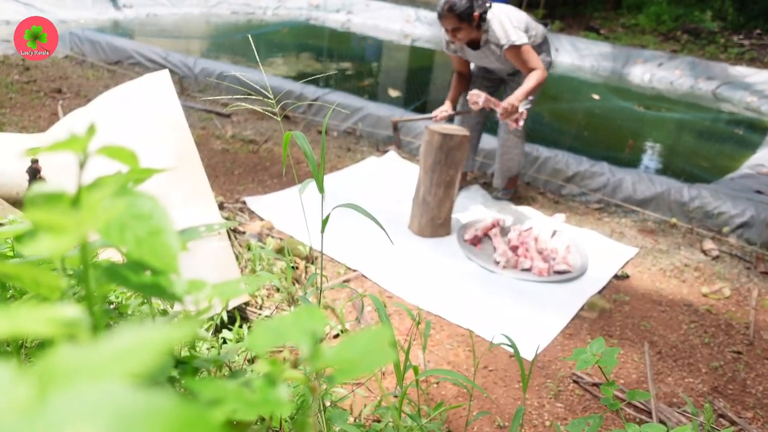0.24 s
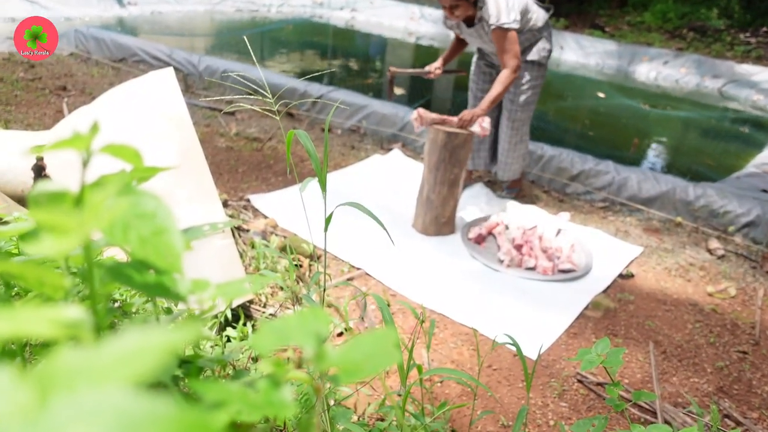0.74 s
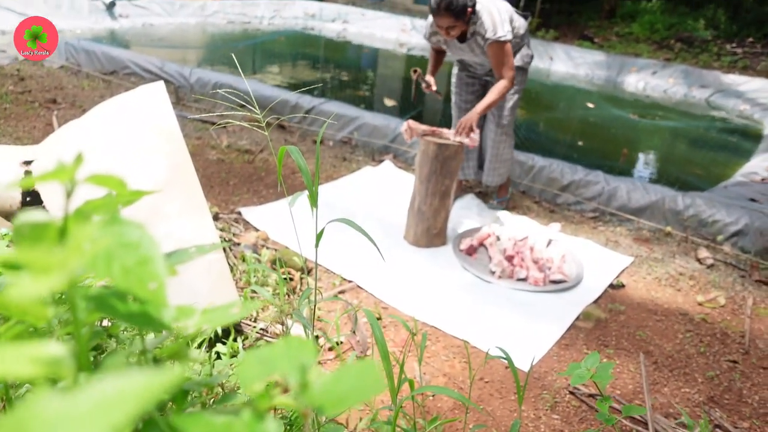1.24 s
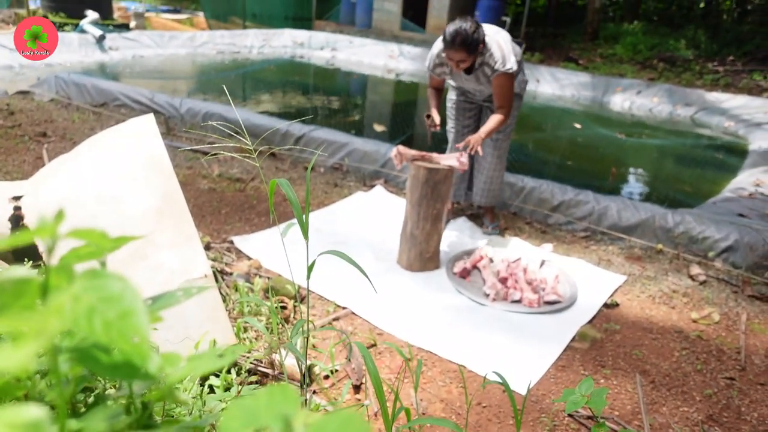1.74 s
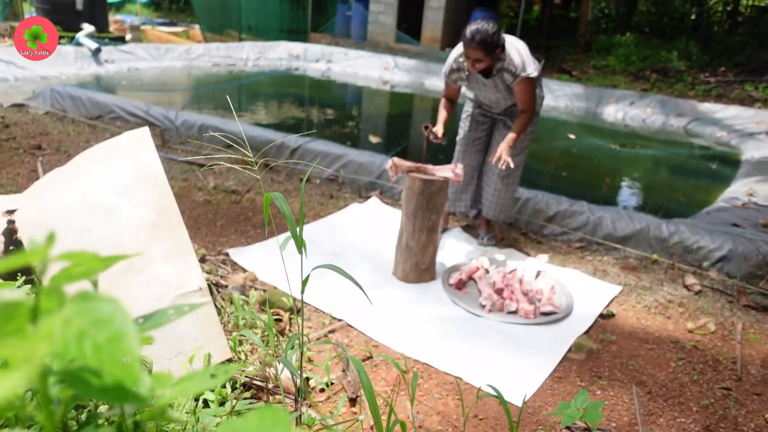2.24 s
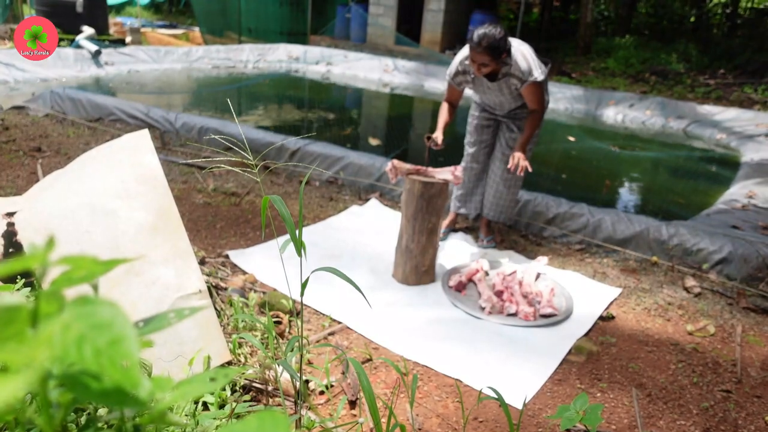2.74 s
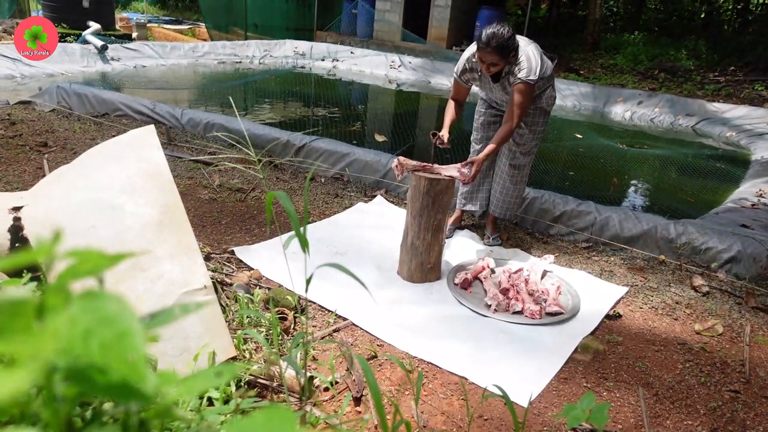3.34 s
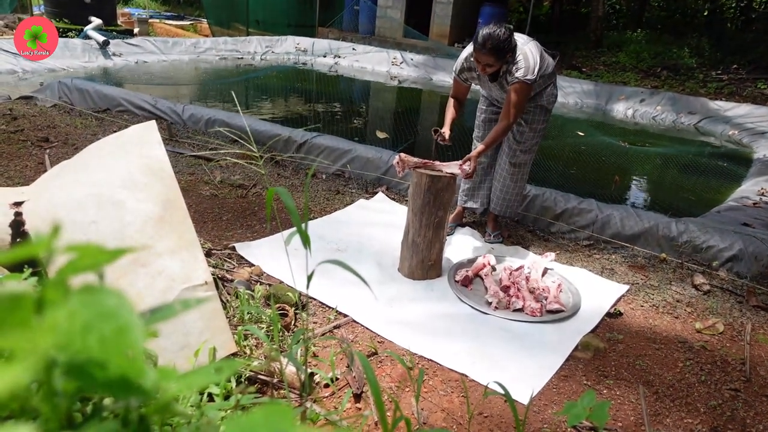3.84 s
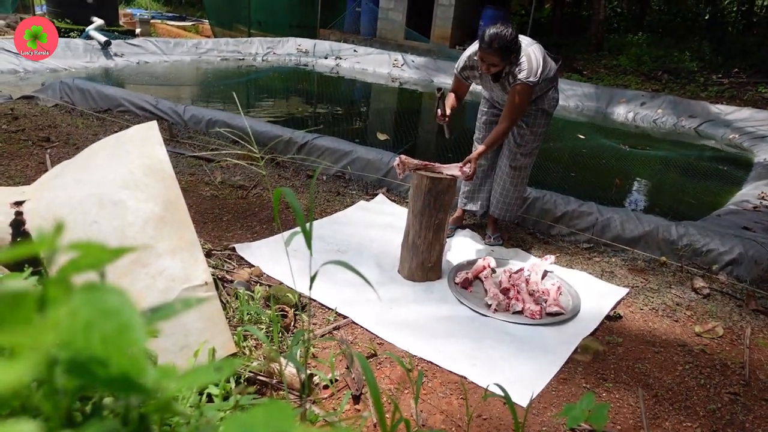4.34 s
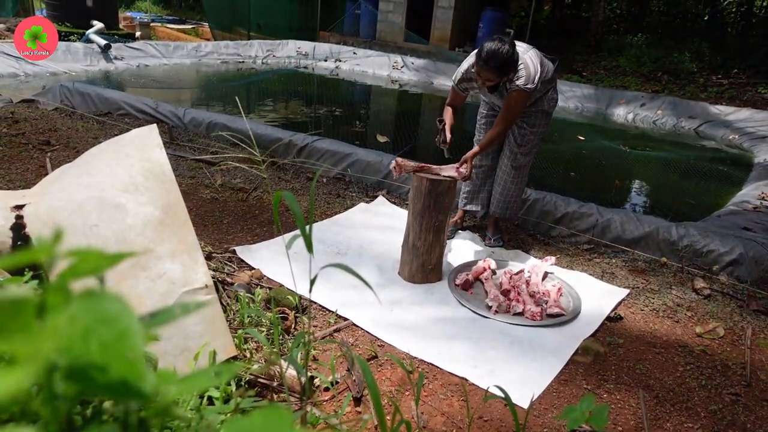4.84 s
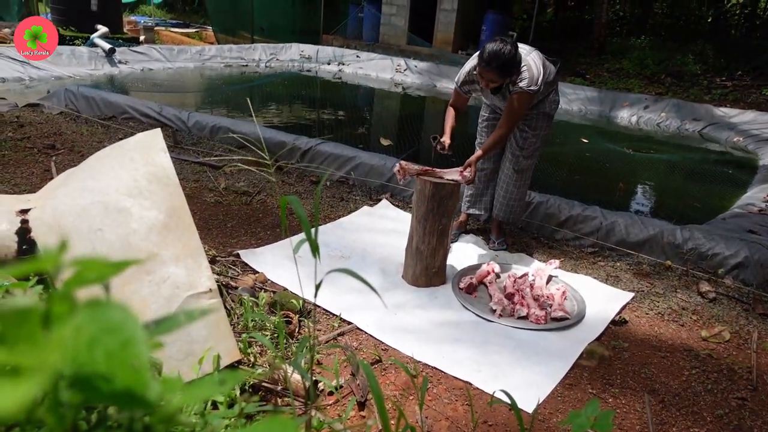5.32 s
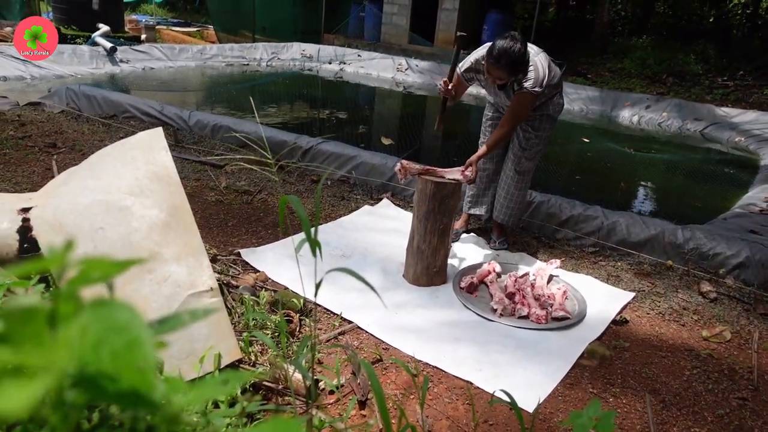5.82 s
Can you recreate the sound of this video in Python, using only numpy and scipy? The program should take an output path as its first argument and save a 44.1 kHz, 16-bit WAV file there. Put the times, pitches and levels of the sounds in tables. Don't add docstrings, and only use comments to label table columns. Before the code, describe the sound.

Heard in open air from a few metres, slightly right of centre: small irregular taps of blade on bone and wood, a few tiny scuffs on a sheet, then a loud bony crack whose axe head rings on at a thin high pitch. After another light tap, a second heavy blow ends the scene. Continuous shrill cicadas, light breeze in grass, low traffic rumble and faint hiss.

```python
import sys
import numpy as np
from scipy import signal
from scipy.fft import rfft, irfft, next_fast_len
from scipy.io import wavfile
from scipy.ndimage import map_coordinates

SR = 44100
rng = np.random.default_rng(int(sys.argv[2]) if len(sys.argv) > 2 else 0)


def int16_out(signal):
    q = np.round(np.clip(np.atleast_2d(signal).T, -1, 1) * 32767)
    wavfile.write(sys.argv[1], SR, q.astype(np.int16))


def linear_from_db(decibels):
    return 10 ** (np.asarray(decibels, float) / 20)


N = 267907

# f/Hz, width/Hz, level/dB
DRONE_MODES = [(2143.5, 171, 5), (4294, 376, -2), (6550, 740, -7)]
# f/Hz, width/Hz, level/dB
SHRILL_MODES = [(8222, 1000, 11.5), (8690, 683, 15)]
# t/s, level/dB
CHORUS_EFFORT = [(0.0, -43), (0.97, -41), (1.5, -41.5), (2.0, -40), (5.37, -41.5), (5.7, -42), (6.04, -44)]
# t/s, level/dB
BREEZE_STRENGTH = [(0, 4.5), (0.701, -1), (1.0, 0.5), (2.0, 0), (2.15, -8), (2.4, 3), (3.1, -3.5),
                   (3.85, -1), (4.05, 1.5), (4.25, -16.5), (4.65, -15), (5.2, -10), (5.8, -9),
                   (6.07, -12.5)]
# f/Hz, level/dB
GRASS_SPECTRUM = [(3000, -52), (3800, 1), (4600, 4.5), (5600, -1.5), (6600, -2), (7600, -9), (9000, 5),
                  (9800, -64)]
# f/Hz, level/dB
LEAF_SPECTRUM = [(1800, -50), (2500, 10), (3000, 12), (3400, 8), (4000, -27), (5000, -43)]
# f/Hz, level/dB
WASH_SPECTRUM = [(120, -35), (250, -5), (400, -8), (640, -0.5), (900, -8), (1400, -2.5), (1800, -6.5),
                 (2500, -1), (3400, -100), (5000, -70)]
# f/Hz, level/dB
RUMBLE_SPECTRUM = [(15, -64), (30, -42), (48, -36), (63, -20), (86, -4), (150, 0), (180, -5), (210, -10),
                   (300, -20), (400, -34), (600, -120)]
# t/s, length/s, swell/dB
VEHICLES = [
    (0.415, 1, 5.5),
    (1.14, .6, 7),
    (2.413, 0.81, 4),
    (3.297, 0.64, 4.5),
    (3.845, 0.2, 8),
    (4.404, 0.3, 5),
    (4.886, 0.5, 7),
    (5.547, 0.57, 8),
    (6.07, .3, 9),
]
# t/s, edge/dB, log/dB, log f/Hz, bone/dB
TAP_EVENTS = [(0.7096, -25.5, -22, 680, -5), (0.7118, -21, -3, 623, -11), (0.7147, -16, -15.5, 563, -17),
              (0.75, -29.5, -12, 413, -26), (0.7741, -24, -22, 496, -24), (.7885, -47, -22, 497, -24),
              (0.813, -33.5, -9.5, 394, -22), (2.032, -26.5, -1, 626, 2.5), (2.3048, -33.5, -32, 611, -31),
              (2.4383, -27.5, -5.5, 560, -19), (2.791, -32, -7.5, 444, -16), (3.8413, -33, 1, 542, -5.5),
              (4.1968, -29.5, -0.5, 487, -6), (5.233, -45, -23, 415, -32), (5.3989, -30, 4, 600, -3.5)]
# f/Hz, width/Hz, level/dB
EDGE_MODES = [(2220, 600, 1.5), (4000, 1500, 2), (5920, 1640, 0), (8800, 2100, -7.5), (10650, 1000, -13.5)]
# f/log pitch, level/dB, t60/s
KNOCK_MODES = [(.7, -11.5, 0.009), (1.001, 6, 0.012), (1.45, -3, 0.017), (2.05, -8, 0.023)]
# f/Hz, level/dB, t60/s
CLACK_MODES = [(1388, 0.5, 0.033), (1726, 2, 0.028), (2620, -28, 0.072)]
HEAD_HZ = [398, 1455, 1950, 2130, 2207, 2972, 3241, 3720, 3973, 5044, 5663]
# level/dB, t60/s
HEAD_DECAYS = [(-17, 0.25), (-17, 0.087), (-12, .07), (-8, .1), (0, 1.5), (-7, 0.11), (-24, 0.16),
               (-30, 0.2), (-25, .4), (-14.5, 0.6), (-26, 0.6)]
# delay/s, transition/s
GRIP_S = (.044, .005)
# f/Hz, t60/s
ECHO_T60 = [(150, 1), (500, 0.41), (1500, 0.68), (3000, 0.94), (6000, 0.65), (12000, 0.83)]
# f/Hz, level/dB
ECHO_SPECTRUM = [(200, -24), (700, 0), (2100, -7), (3300, 3), (5000, -1), (8000, -3), (14000, -5.5)]
# t/s, length/s, level/dB
SCUFF_EVENTS = [
    (1.504, 0.01, -37),
    (1.519, 0.018, -39),
    (2.275, 0.021, -59),
    (2.52, 0.057, -34.5),
    (2.579, 0.03, -45),
]
# f/Hz, level/dB
SCUFF_SPECTRUM = [(500, -19), (1000, -1.5), (2500, 2.5), (4500, -1.5), (7000, -13), (11000, -25)]
# t/s, peak/dB, log/dB, edge/dB
BLOW_EVENTS = [
    (4.78, -4.5, 0, 1),
    (6.048, -7.5, 4.5, 2),
]
# f/Hz, width/Hz, level/dB
WOOD_MODES = [(422, 110, 4.5), (600, 170, 1), (910, 120, -3)]
# f/Hz, width/Hz, level/dB
BONE_MODES = [(1458, 73, 4), (1567, 174, -3.5), (2120, 264, 1), (2430, 67, -46.5)]
# f/Hz, level/dB
HISS_SPECTRUM = [(8500, -40), (9800, -4), (10800, 0), (11500, -3), (12300, 0), (14000, 0), (16000, 0)]


def unit(x):
    return x / np.sqrt(np.mean(x ** 2) + 1e-20)


def along(points, hz):
    f, v = np.transpose(points)
    return np.interp(np.log(hz + 1), np.log(f + 1), v)


def over_time(points):
    return np.interp(np.arange(N) / SR, *np.transpose(points))


def wobble(rate_hz):
    knots = rng.standard_normal(int(N * rate_hz / SR) + 4)
    return map_coordinates(knots, [np.arange(N) * rate_hz / SR])


def filtered(x, response):
    m = next_fast_len(N + SR // 2)
    return irfft(rfft(x, m) * response(np.fft.rfftfreq(m, 1 / SR)), m)[..., :N]


def resonances(modes):
    def response(f):
        total = 0
        for k, (center, width, db) in enumerate(modes):
            peak = 1j * f * width / (center * center - f * f + 1j * f * width)
            total = total + (-1) ** k * linear_from_db(db) * peak
        return total
    return response


def noise(spectrum):
    return filtered(rng.standard_normal((2, N)), lambda f: linear_from_db(along(spectrum, f)))


def spread(pair, alike, left_db):
    turn = np.arccos(np.clip(alike, 0, 1)) / 2
    mid, side = unit(pair) * [[np.cos(turn)], [np.sin(turn)]]
    return np.array([mid + side, mid - side]) * linear_from_db([[left_db / 2], [-left_db / 2]])


def add(track, s, sound):
    start = round(s * SR)
    track[start:][:len(sound)] += sound[:N - start]


def chorus(modes, clumpy_db, rate_hz):
    clumps = np.array([wobble(rate_hz), wobble(rate_hz)])
    clicks = rng.standard_normal((2, N)) * linear_from_db(clumpy_db * clumps)
    body = resonances(modes)
    return filtered(clicks, lambda f: body(f) ** 2)


def cicadas():
    effort_db = over_time(CHORUS_EFFORT)
    mean_db = effort_db.mean()
    drone_db = mean_db - 3.5 + 0.27 * (effort_db - mean_db)
    shrill = spread(chorus(SHRILL_MODES, clumpy_db=0.5, rate_hz=250), alike=0.42, left_db=-3.0)
    drone = spread(chorus(DRONE_MODES, clumpy_db=-1.0, rate_hz=24), alike=0.76, left_db=-4.0)
    shrill = shrill * linear_from_db(effort_db + 1.0 + 0.6 * wobble(12))
    return shrill + drone * linear_from_db(drone_db + 0.71 * wobble(15))


def foliage():
    breeze_db = over_time(BREEZE_STRENGTH)
    grass_db = -54 + 0.27 * breeze_db + 1.4 * wobble(3.48)
    leaves_db = -57 + breeze_db + 0.76 * wobble(42)
    grass = linear_from_db(grass_db) * spread(noise(GRASS_SPECTRUM), alike=0.45, left_db=-1.5)
    leaves = linear_from_db(leaves_db) * spread(noise(LEAF_SPECTRUM), alike=0.61, left_db=1.0)
    return grass + leaves


def traffic():
    t = np.arange(N) / SR
    rumble_db = -60.5 + 1.5 * wobble(8)
    for s, length_s, swell_db in VEHICLES:
        rumble_db += swell_db * np.exp(-(2 * (t - s) / length_s) ** 2)
    wash_db = -51.0 + 0.09 * wobble(7.6)
    wash = linear_from_db(wash_db) * spread(noise(WASH_SPECTRUM), alike=0.09, left_db=-1.0)
    rumble = linear_from_db(rumble_db) * spread(noise(RUMBLE_SPECTRUM), alike=0.94, left_db=0.0)
    return wash + rumble


def burst(rise_s, t60_s, grit_db):
    t = np.arange(SR // 10) / SR
    grit = rng.standard_normal(len(t)) * linear_from_db(grit_db * rng.standard_normal(len(t)))
    return unit(grit) * (1 - np.exp(-t / rise_s)) * linear_from_db(-60 * t / t60_s)


def damped(modes, rise_s, scatter_db):
    t = np.arange(SR // 10) / SR
    ring = np.zeros(len(t))
    for hz, db, t60_s in modes:
        level_db = db + scatter_db * rng.normal() - 60 * t / t60_s
        ring += linear_from_db(level_db) * np.sin(2 * np.pi * hz * t)
    return ring * (1 - np.exp(-t / rise_s))


def thump(start_hz, end_hz, t60_s):
    t = np.arange(SR // 5) / SR
    hz = end_hz + (start_hz - end_hz) * np.exp(-t / 0.027)
    swing = np.sin(2 * np.pi * np.cumsum(hz) / SR)
    return swing * (1 - np.exp(-t / 0.0021)) * linear_from_db(-60 * t / t60_s)


def steel(scatter_db, muffle_t60_s, soft_db):
    t = np.arange(SR) / SR
    grip_s, over_s = GRIP_S
    held = 0.05 + 0.95 / (1 + np.exp(np.minimum((t - grip_s) / over_s, 50)))
    shiver_db, shiver_hz = 3, 60
    ring = np.zeros(SR)
    for k, (hz, (db, t60_s)) in enumerate(zip(HEAD_HZ, HEAD_DECAYS)):
        knots = rng.standard_normal(shiver_hz + 1)
        shiver = np.interp(t * shiver_hz, np.arange(shiver_hz + 1), knots)
        reach = held if hz < 2500 else linear_from_db(soft_db + shiver_db * shiver)
        level = linear_from_db(db + scatter_db * rng.normal() - 60 * t / t60_s)
        ring += (-1) ** k * level * np.sin(2 * np.pi * hz * t) * reach
    return ring * linear_from_db(-60 * t / muffle_t60_s)


def taps():
    edge, body, ground = np.zeros((3, N))
    ring = steel(scatter_db=4.0, muffle_t60_s=0.11, soft_db=-10)
    for s, db, log_db, log_hz, bone_db in TAP_EVENTS:
        ring_db = 0 if bone_db > -5 else -37
        log_modes = [(log_hz * ratio, level_db, t60_s) for ratio, level_db, t60_s in KNOCK_MODES]
        knock = damped(log_modes, rise_s=0.0014, scatter_db=2.16)
        clack = damped(CLACK_MODES, rise_s=0.002, scatter_db=3.5)
        add(edge, s, linear_from_db(db + 8.5) * burst(rise_s=0.00039, t60_s=0.013, grit_db=5.0))
        add(body, s + 0.00162, linear_from_db(db + log_db + 8.5) * knock)
        add(body, s + 0.00081, linear_from_db(db + bone_db + 2) * clack)
        add(body, s + 0.0014, linear_from_db(db + ring_db) * ring)
        thud = thump(start_hz=168, end_hz=79, t60_s=0.19)
        add(ground, s + 0.0042, linear_from_db(db + log_db - 12.5) * thud)
    return filtered(edge, resonances(EDGE_MODES)) + body, ground


def trees(x):
    hz, t, z = signal.stft(rng.standard_normal((2, SR)), SR, nperseg=256)
    decay_db = along(ECHO_SPECTRUM, hz)[:, None] - 60 * t / along(ECHO_T60, hz)[:, None]
    shape = linear_from_db(decay_db) * (1 - np.exp(-t / 0.0094))
    tail = signal.istft(z * shape, SR, nperseg=256)[1]
    tail = spread(tail, alike=0.67, left_db=-2.0)
    return signal.fftconvolve(x[None], tail / np.linalg.norm(tail[0]), axes=1)[:, :N]


def scuffs():
    stroke = np.zeros(N)
    for s, length_s, db in SCUFF_EVENTS:
        add(stroke, s, linear_from_db(db) * np.hanning(round(length_s * SR)) ** 0.53)
    grit = rng.standard_normal(N) * linear_from_db(4.2 * wobble(300))
    return stroke * unit(filtered(grit, lambda f: linear_from_db(along(SCUFF_SPECTRUM, f))))


def blows():
    wood, bone, edge, ground, head = np.zeros((5, N))
    for s, db, wood_db, edge_db in BLOW_EVENTS:
        add(wood, s, linear_from_db(db + wood_db + 7.5) * burst(rise_s=0.00048, t60_s=0.023, grit_db=1.0))
        add(bone, s, linear_from_db(db + 11.5) * burst(rise_s=0.00094, t60_s=0.048, grit_db=-0.5))
        add(edge, s, linear_from_db(db + edge_db + 1.5) * burst(rise_s=0.0011, t60_s=0.028, grit_db=5.0))
        add(ground, s + 0.0185, linear_from_db(db - 21) * thump(start_hz=129, end_hz=82.6, t60_s=0.11))
        add(head, s + 0.0045, linear_from_db(db - 9.5) * steel(scatter_db=0, muffle_t60_s=5, soft_db=3))
    crack = filtered(wood, resonances(WOOD_MODES))
    crack += filtered(bone, resonances(BONE_MODES))
    crack += filtered(edge, resonances(EDGE_MODES))
    return crack, head, ground


def scene():
    air = cicadas() + foliage() + traffic()
    knocks, ground = taps()
    light = knocks + scuffs()
    crack, ring, heavy_ground = blows()
    echoes = trees(linear_from_db(-3) * crack + linear_from_db(-11.5) * ring + linear_from_db(-16.5) * light)
    direct = (crack + ring + light) * linear_from_db([[-1.3], [1.3]])
    return direct + heavy_ground + ground + echoes + air


def band_limit(x):
    return signal.sosfilt(signal.butter(12, 16640, fs=SR, output="sos"), x)


def record(dry):
    hiss = linear_from_db(-62) * spread(noise(HISS_SPECTRUM), alike=0.42, left_db=0)
    top_hz = 15730
    limited = filtered(dry + hiss, lambda hz: hz < top_hz)
    return band_limit(limited)


dry = scene()
out = record(dry)
int16_out(out)
```